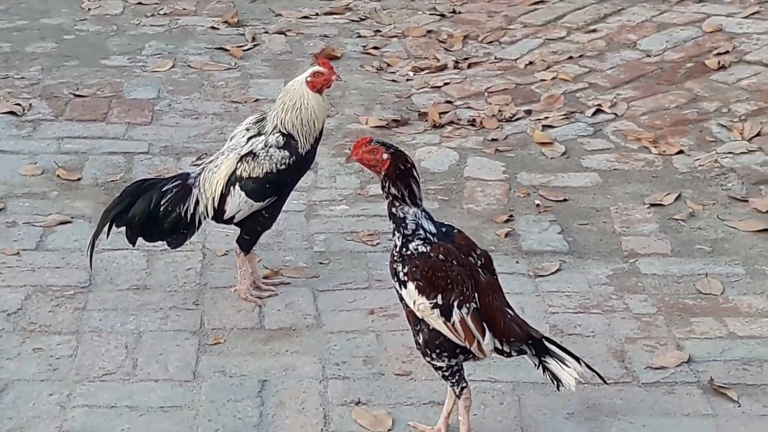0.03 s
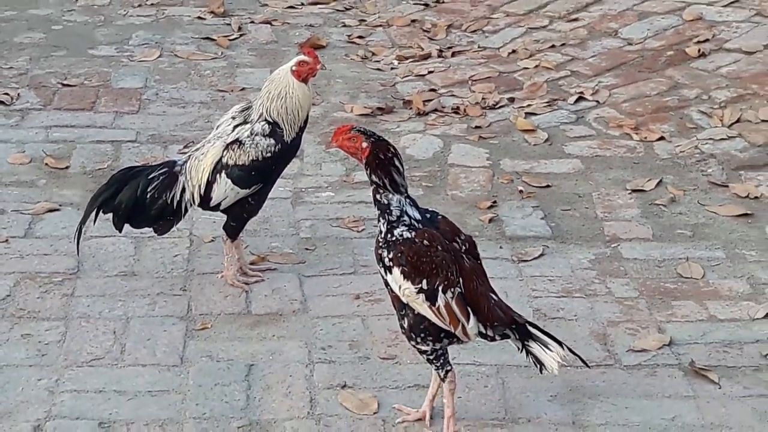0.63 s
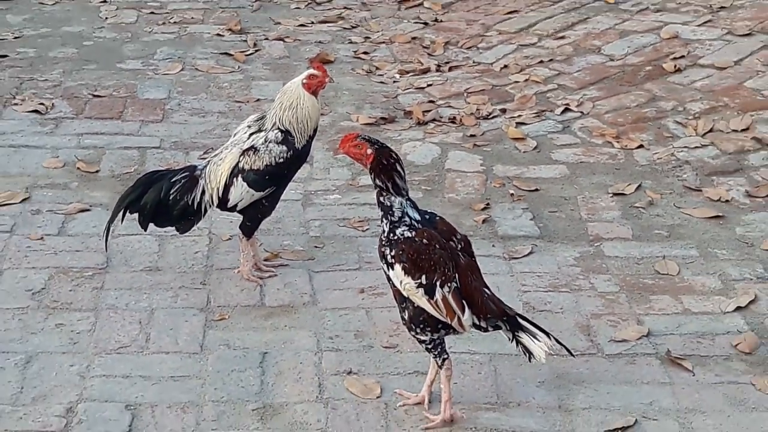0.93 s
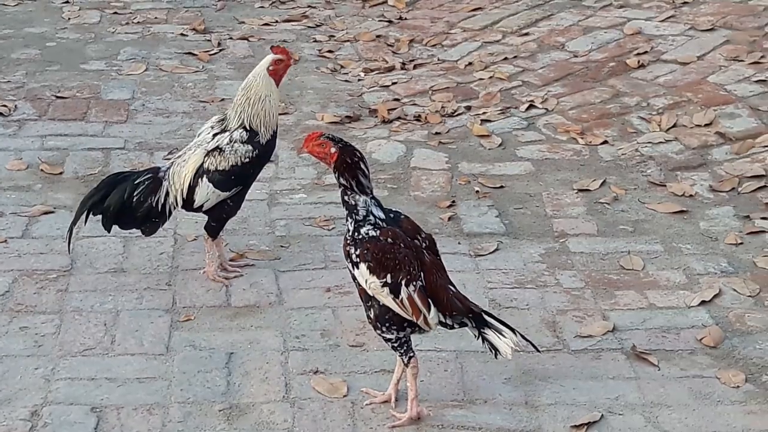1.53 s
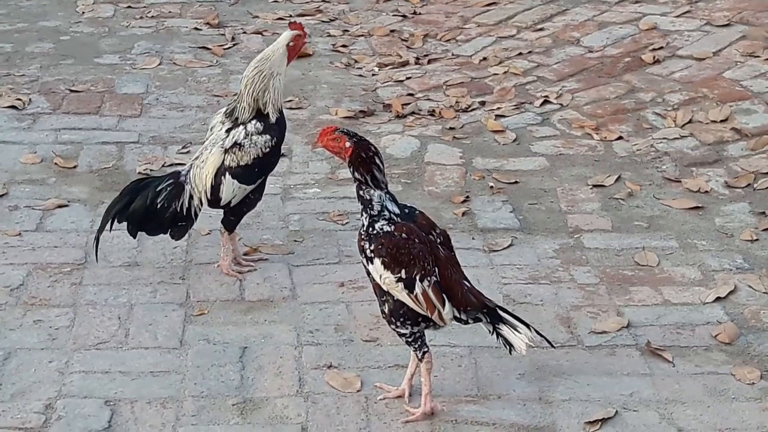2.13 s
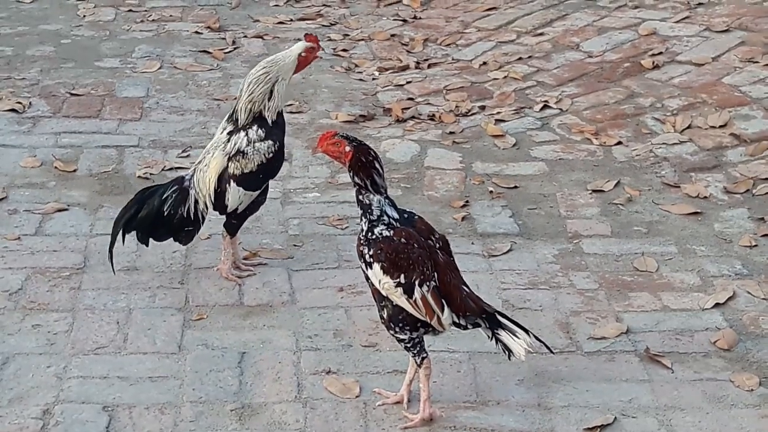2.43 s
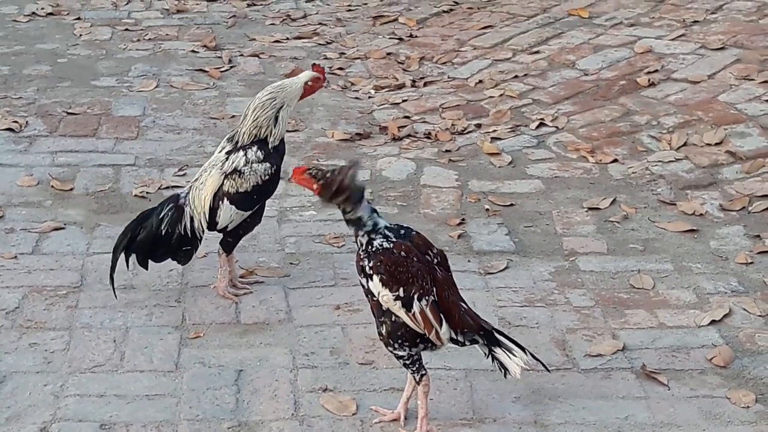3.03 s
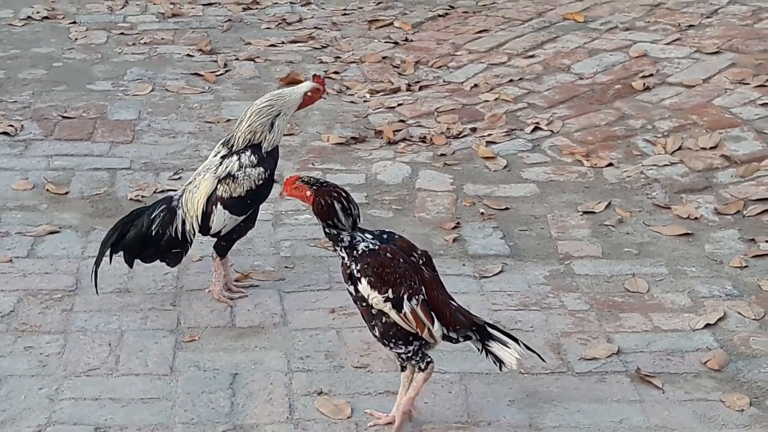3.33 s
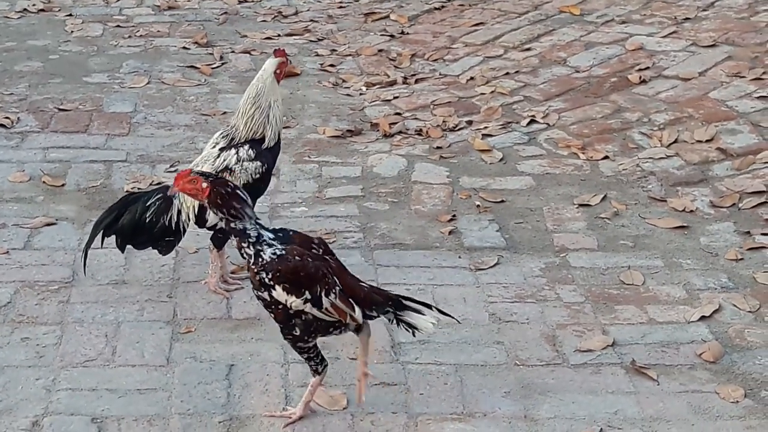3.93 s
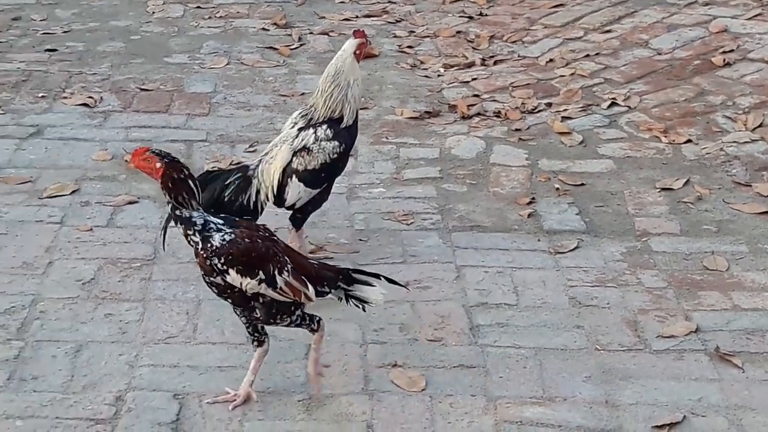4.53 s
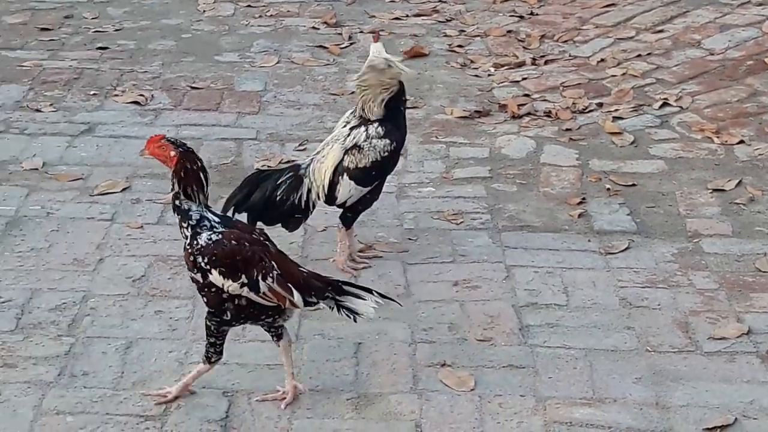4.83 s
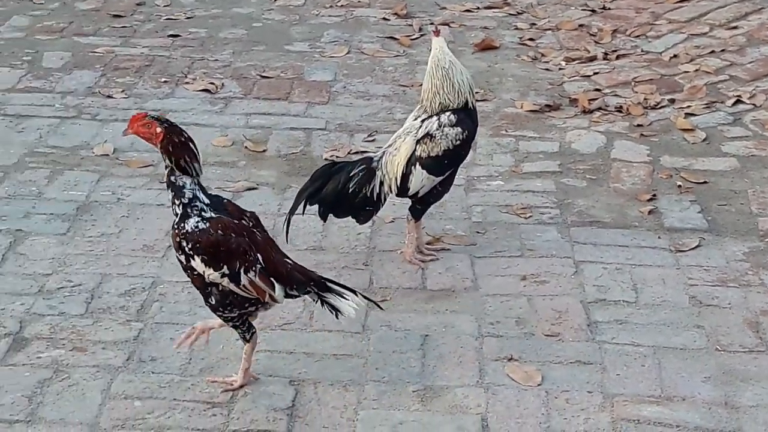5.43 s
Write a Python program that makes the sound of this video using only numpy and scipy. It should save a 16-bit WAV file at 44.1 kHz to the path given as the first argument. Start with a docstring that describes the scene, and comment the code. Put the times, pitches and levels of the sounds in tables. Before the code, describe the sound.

A rooster crows once nearby in a yard, over faint bird chirps, a distant puttering engine and soft hiss.

```python
"""A soft background hiss lies under a brick farmyard; a distant engine putters up, a far bird calls
hoarsely and small birds chirp, with a light tick on the paving. At 2.3 s a rooster a few metres away
crows once: its syrinx flips between a high ringing register, a low register and a chaotic rasp, and
paving and walls answer. From 3.7 s the birds are heard again, with a second tick; the engine swells,
then falls back to idle."""
import sys
import numpy as np
from scipy import signal
from scipy.fft import rfft, irfft
from scipy.io import wavfile
from scipy.ndimage import uniform_filter1d, minimum_filter1d

SR = 44100
rng = np.random.default_rng(int(sys.argv[2]) if len(sys.argv) > 2 else 0)


def output_pcm(signal):
    """Save a mono or channel-first signal as 16-bit PCM at the path in sys.argv[1].

    Samples are clipped to [-1, 1] before scaling.
    """
    pcm = np.clip(np.atleast_2d(signal).T, -1, 1) * 32767
    wavfile.write(sys.argv[1], SR, np.round(pcm).astype(np.int16))


N = 251370
TIME = np.arange(N) / SR
TOP_HZ = 15750  # upper edge of the sound

# bursts of rasp where the voice breaks:
# start_s, length_s, attack_s, release_s, low_db, upper_db, edge_db, slaps_per_s, chaos (0-1)
RASP_BURSTS = [(2.364, 0.1775, 0.018, 0.0738, -22.5, -24, -29, 511.4, .3),
               (2.663, 0.0418, .018, 0.0245, -17, -29, -46.5, 690, .12),
               (2.77, 0.0523, 0.022, 0.0307, -20.5, -29.5, -53, 780, 0.21),
               (2.844, 0.0572, 0.0302, 0.0248, -18, -24.5, -39.5, 730, .13),
               (2.92, 0.228, .045, 0.04, -24, -29.5, -42.5, 418, .145),
               (3.215, 0.2496, 0.0291, 0.023, -23, -28.5, -58.5, 634.5, 0.2),
               (3.534, 0.0481, 0.0122, 0.0424, -26.5, -35.5, -60.5, 436, 0.22)]


def gain_of(db):
    """Decibels to amplitude."""
    return 10 ** (np.asarray(db) / 20)


def unit_rms(x):
    """Scales to rms 1."""
    return x / np.sqrt(np.mean(x ** 2) + 1e-20)


def curve_at(points, hz):
    """Reads a curve on a log-frequency axis."""
    f, value = np.transpose(points)
    return np.interp(np.log(hz + 1), np.log(f + 1), value)


def add(mix, start_s, sound):
    """Mixes a sound in at start_s."""
    part = mix[max(round(start_s * SR), 0):][:len(sound)]
    part += sound[:len(part)]


def wander(hz, size):
    """Smooth random drift of rms about 1, moving at up to about hz."""
    f = np.fft.rfftfreq(2 ** 15, 1 / SR)
    return unit_rms(irfft(rfft(rng.standard_normal(2 ** 15)) / (1 + (f / hz) ** 4)))[:size]


def resonate(x, hz, width_hz):
    """A steep resonance of gain 1 whose centre can glide."""
    turn = np.exp(2j * np.pi * np.cumsum(hz * np.ones(len(x))) / SR)
    r = np.exp(-np.pi * width_hz / SR)
    return 2 * (turn * signal.lfilter([(1 - r) ** 2], [1, -2 * r, r * r], x / turn + 1e-18)).real


def envelope(length_s, attack_s, release_s):
    """Time within a note, and its rounded attack, hold and release."""
    t = np.arange(round(length_s * SR)) / SR
    rise = np.sin(np.pi / 2 * np.minimum(t / attack_s, 1))
    fall = np.sin(np.pi / 2 * np.minimum((length_s - t) / release_s, 1))
    return t, rise * fall


def stereo_pair(left, other, likeness, hz):
    """Blends two noise spectrograms into left and right, as alike as asked in each band."""
    same = np.clip(curve_at(likeness, hz), -1, 1)[:, None]
    return np.array([left, same * left + np.sqrt(1 - same ** 2) * other])


def whistle(hz, taper):
    """A sine of rms 1 that follows a pitch curve and fades at both ends."""
    return unit_rms(np.sin(2 * np.pi * np.cumsum(hz) / SR) * signal.windows.tukey(len(hz), taper))


def background_hiss(level_db, patchy_db):
    """A soft bed of noise with drifting patches, nearly mono in the bass."""
    # spectrum of the soft background hiss, strongest in the bass, almost silent above 8 kHz:
    # frequency_hz, relative_db
    spectrum = [(22, -43), (45, -33), (66, -12.5), (105, -4.5), (170, -3.5), (300, -4.5), (500, -7),
                (900, -10.5), (2000, -15), (3500, -20.5), (5000, -29), (8000, -36.5), (10000, -61.5),
                (15500, -44)]
    # likeness of left and right: frequency_hz, correlation
    likeness = [(50, 0.96), (200, 0.89), (500, 0.65), (1200, 0), (3000, 0), (10000, 0.01)]
    frames, hz = N // 512 + 5, np.fft.rfftfreq(2048, 1 / SR)
    a, b, c, d, patches = rng.standard_normal((frames, len(hz), 5)).T
    patches = unit_rms(uniform_filter1d(uniform_filter1d(patches, size=16, axis=0), size=10, axis=1))
    bands = stereo_pair(a + 1j * b, c + 1j * d, likeness, hz)
    bands *= gain_of(curve_at(spectrum, hz)[:, None] + patchy_db * patches)
    return gain_of(level_db) * unit_rms(signal.istft(bands, nperseg=2048, noverlap=1536)[1][:, :N])


def engine(pipe_hz, width_hz, thud_hz, thud_db):
    """Each firing of a far single cylinder thumps in its exhaust pipe, over a duller thud."""
    # revving up, then idling away: time_s, level_db, firings_per_s
    revs = [(0, -80.5, 22.66), (1.7, -53.5, 29.7), (3.2, -53, 28.74), (3.85, -45.5, 28.72),
            (4.13, -40.5, 29), (4.2, -50, 28.1), (4.55, -49.5, 25), (4.7, -58, 24.5), (5.7, -59, 25)]
    times, *curves = np.transpose(revs)
    db, rate = (np.interp(TIME, times, curve) for curve in curves)
    firings = np.diff(np.floor(np.cumsum(rate) / SR), prepend=0)
    firings *= gain_of(2.09 * rng.standard_normal(N))
    pipe = unit_rms(resonate(resonate(firings, pipe_hz, width_hz), pipe_hz, 2 * width_hz))
    thud = unit_rms(resonate(firings, thud_hz, width_hz=110))
    return gain_of(db) * (pipe + gain_of(thud_db) * thud)


def ticks():
    """Tiny dry clicks, as of a claw or leaf on brick."""
    # taps on the paving: start_s, peak_db
    taps = [(1.1222, -49), (4.2231, -45.5)]
    out, t = np.zeros(N), TIME[:2000]
    for start_s, db in taps:
        burst = rng.standard_normal(len(t)) * np.exp(-t / 0.0042)
        click = resonate(burst, hz=5100, width_hz=2830)
        add(out, start_s, gain_of(db) * click / abs(click).max())
    return out


def far_bird():
    """Sagging calls, made hoarse by a fast waver in pitch."""
    # hoarse calls: start_s, length_s, pitch_hz, relative_db
    calls = [(0, 0.0706, 1847, -50.5), (0.39, 0.239, 1839, -48), (0.941, 0.2016, 1827, -47.5),
             (1.711, 0.177, 1805, -47.5), (3.851, 0.2159, 1818, -43.5), (4.208, 0.1543, 1755, -48)]
    out = np.zeros(N)
    for start_s, length_s, hz, db in calls:
        progress = np.linspace(0, 1, int(length_s * SR))
        pitch = hz * (1.035 - .03 * progress) + 125 * wander(600, len(progress))
        add(out, start_s, gain_of(db - 3) * whistle(pitch, taper=.5))
    return out


def small_birds():
    """Short gliding whistles with a smeared pitch."""
    # chirps: start_s, length_s, start_hz, end_hz, relative_db, smear_hz
    chirps = [(0.832, 0.05, 5150, 5910, -62.5, 300), (0.931, 0.0357, 2017, 2320, -46, 120),
              (1.03, 0.179, 2130, 2765, -56, 120), (1.401, 0.156, 4080, 5270, -54.5, 170),
              (1.484, 0.151, 4614, 5900, -60, 222), (1.662, 0.16, 4630, 5510, -62.5, 301),
              (1.739, 0.082, 6900, 6900, -62.5, 300), (1.915, 0.26, 4996, 5120, -61.5, 295.7),
              (1.956, 0.063, 6900, 7310, -64, 300), (2.149, 0.057, 6833, 6680, -60, 249),
              (3.758, 0.044, 5320, 4530, -56, 40.35), (4.484, 0.0854, 4740, 5900, -62.5, 200),
              (4.705, 0.082, 4710, 5900, -63, 200), (4.928, 0.066, 4610, 5760, -64, 199.8),
              (5.041, 0.108, 3958, 2880, -56.5, 150), (5.086, .125, 3756, 2575, -50, 81)]
    out = np.zeros(N)
    for start_s, length_s, start_hz, end_hz, db, smear_hz in chirps:
        progress = np.linspace(0, 1, int(length_s * SR))
        glide = end_hz + (start_hz - end_hz) * (1 - progress) ** 1.8
        pitch = glide + smear_hz * wander(550, len(progress))
        add(out, start_s, gain_of(db) * whistle(pitch, taper=.6))
    return out


def yard_reverb(x):
    """Diffuse ring of the yard: quick scatter off the bricks, then each band dies at its own speed."""
    # decay of the ring: frequency_hz, t60_s
    decay = [(300, 0.65), (560, 1.662), (800, 0.424), (1200, 0.55), (1700, 1.35), (2500, 0.75),
             (5000, 0.803), (9000, 0.67), (15000, 0.11)]
    # likeness of left and right: frequency_hz, correlation
    likeness = [(200, .85), (600, .45), (1200, -.3), (4000, -.4)]
    hz, t, (left, other) = signal.stft(rng.standard_normal((2, SR)), SR, nperseg=256)
    ring = gain_of(-60 * t / curve_at(decay, hz)[:, None])
    early = 1.2 * np.exp(-t / 0.0047)
    build_up = 1 - np.exp(-t / 0.00664)
    bands = stereo_pair(left, other, likeness, hz) * (ring + early) * build_up
    tail = signal.istft(bands, SR, nperseg=256)[1]
    return signal.fftconvolve(x[None], tail / np.linalg.norm(tail[0]), axes=1)[:, :N]


def with_echoes(x):
    """The direct sound and its first distinct reflections."""
    # bounces off paving and walls: delay_s, left_gain, right_gain
    bounces = [(0.0125, 0.11, 0.018), (0.0203, 0.213, -0.359), (.034, 0.12, 0.194), (.049, -.07, .09),
               (0.084, 0.134, 0.195)]
    out = np.array([x, x])
    for delay_s, left, right in bounces:
        add(out[0], delay_s, left * x)
        add(out[1], delay_s, right * x)
    return out


def paving_scatter(x, above_hz, decay_s):
    """Treble thrown back at once by the rough paving, different left and right."""
    t = TIME[:1024]
    spray = rng.standard_normal((2, len(t))) * np.exp(-t / decay_s)
    low_cut = signal.butter(2, above_hz, "highpass", fs=SR, output="sos")
    spray = signal.sosfilt(low_cut, spray / np.linalg.norm(spray[0]))
    return signal.oaconvolve(x[None], spray, axes=1)[:, :N]


def windpipe(drive, modes, beak):
    """Rings the windpipe's modes; those below 4500 Hz move with the beak."""
    return unit_rms(sum(gain_of(db) * resonate(drive, hz * (beak if hz < 4500 else 1), width_hz)
                        for hz, width_hz, db in modes))


def rasp(start_s, length_s, attack_s, release_s, low_db, upper_db, edge_db, slaps_per_s, chaos):
    """The membranes slap at uneven intervals and, with the breath, ring the windpipe."""
    # low and upper windpipe modes, and the harsh edge of a pressed voice: centre_hz, width_hz, gain_db
    low_modes = [(707.7, 106.6, 4.5), (1125, 335, 2.5), (1347.5, 91, -9.5), (1699, 171.4, 3),
                 (2130, 98.4, -3)]
    upper_modes = [(2543, 110, -21.5), (2894.7, 100.7, 6), (3481, 200, -3.5), (3855, 286, 8),
                   (4119, 87, -4), (4971.4, 160, -3), (5900, 120, -26.5), (6900, 320, -31),
                   (7874, 617, -27), (12360, 970, -29)]
    edge_modes = [(2860, 130, -1.5), (3174, 530, 6.5), (3990, 140, 2), (5910, 210, -5), (7920, 440, -25.5),
                  (12900, 1300, -43.5)]
    # the beak's opening retunes the modes: time_s, frequency_ratio
    beak_moves = [(2.34, 0.947), (2.43, 0.968), (2.53, 0.937), (2.8, 1.0175), (2.88, 1.0206),
                  (3.25, 0.9356), (3.45, 0.9304), (3.57, 0.847)]
    t, shape = envelope(length_s, attack_s, release_s)
    beak = np.interp(start_s + t, *np.transpose(beak_moves))
    cycles = np.cumsum(slaps_per_s * np.exp(chaos * wander(397.77, len(t)))) / SR
    slaps = np.diff(np.floor(cycles), prepend=0) * gain_of(10 * chaos * wander(600, len(t)))
    breath = 0.413 * rng.standard_normal(len(t))
    drive = unit_rms(slaps - slaps.mean()) + breath
    layers = (low_db, low_modes), (upper_db, upper_modes), (edge_db, edge_modes)
    return shape * sum(gain_of(db) * windpipe(drive, modes, beak) for db, modes in layers)


def rasp_strength():
    """Amplitude of the chaotic vibration through the crow."""
    out = np.zeros(N)
    for start_s, length_s, attack_s, release_s, low_db, *_ in RASP_BURSTS:
        add(out, start_s, gain_of(low_db) * envelope(length_s, attack_s, release_s)[1])
    return out


def syrinx(start_s, hz, level, tone, fundamental_db, blur_hz, jitter, shimmer_db, flutter_hz, doubling):
    """Regular vibration; as the rasp gains on it, pitch wavers and cycles alternate strong and weak."""
    rasp_level = gain_of(7.5) * rasp_strength()[round(start_s * SR):][:len(hz)]
    unrest = 0.078 + rasp_level / (rasp_level + level + 1e-9)  # even a clean note wavers a little
    pitch = hz * (1 + jitter * unrest * wander(flutter_hz, len(hz)))
    phase = 2 * np.pi * np.cumsum(pitch) / SR
    alternate = 1 + doubling * unrest * np.cos(phase / 2)  # adds tones midway between the overtones
    wave, power = 0, 0
    for k in range(1, 28):
        size = gain_of(curve_at(tone, k * hz) + fundamental_db * (k == 1)) * (k * hz < TOP_HZ)
        # turbulence smears the overtones, most of all above blur_hz
        blur = np.minimum((k * hz / blur_hz) ** 2, 2) * wander(170, len(hz))
        lag = np.pi * (k // 2)  # the windpipe delays each overtone differently, rounding the pulses
        wave = wave + size * np.sin(k * phase + lag + blur) * (alternate if k > 1 else 1)
        power = power + size ** 2 / 2
    shimmer = gain_of(shimmer_db * unrest * np.tanh(wander(66, len(hz))))
    return wave / np.sqrt(power) * level * shimmer


def high_note(start_s, length_s, attack_s, release_s, db, swell_db_per_s, top_hz, scoop, bend_s=.012):
    """The taut syrinx scoops up to a ringing, slightly arched pitch and droops at the end."""
    # overtone balance: frequency_hz, relative_db
    tone = [(600, 24), (840, -3.5), (1680, -0.5), (2520, -20), (3370, -30.5), (4200, -33), (5060, -30.5),
            (5900, -39), (6760, -36.5), (7600, -48.5), (8440, -42), (10200, -61.5), (13000, -47),
            (15500, -60)]
    t, shape = envelope(length_s, attack_s, release_s)
    droop = 0.0697 * np.exp((t - length_s) / bend_s)
    arch = 0.02517 * (2 * t / length_s - 1) ** 2
    hz = top_hz * (1 - scoop * np.exp(-t / bend_s) - droop - arch)
    level = shape * gain_of(db + swell_db_per_s * t)
    return syrinx(start_s, hz, level, tone, fundamental_db=0, blur_hz=8000,
                  jitter=0.02406, shimmer_db=5, flutter_hz=191, doubling=0.34)


def low_note(start_s, length_s, attack_s, release_s, db, start_hz, middle_hz, end_hz, fundamental_db):
    """The slack syrinx holds a low pitch that bends at both ends."""
    # overtone balance: frequency_hz, relative_db
    tone = [(530, -4), (1080, 6.5), (1640, -5), (2180, -13.5), (2720, -17), (3300, -16), (3700, -12),
            (4400, -27.5), (4950, -22.5), (5600, -36), (8400, -44), (15000, -50)]
    t, shape = envelope(length_s, attack_s, release_s)
    from_middle = 2 * t / length_s - 1
    hz = middle_hz + (np.where(from_middle < 0, start_hz, end_hz) - middle_hz) * from_middle ** 2
    return syrinx(start_s, hz, shape * gain_of(db), tone, fundamental_db, blur_hz=4500,
                  jitter=0.01112, shimmer_db=3.5, flutter_hz=140, doubling=.05)


def crow():
    """Both registers and the rasp of one crow; the small beak radiates no bass."""
    # ringing high register:
    # start_s, length_s, attack_s, release_s, level_db, swell_db_per_s, pitch_hz, scoop (share of pitch)
    high_notes = [(2.361, 0.203, 0.0281, 0.108, -20.5, -12, 815.3, .25),
                  (2.666, .125, 0.0512, 0.0434, -15, 86, 848.8, .27),
                  (2.869, 0.2454, 0.0282, 0.0392, -12, -25, 847.2, 0)]
    # low register:
    # start_s, length_s, attack_s, release_s, level_db, start_hz, middle_hz, end_hz, fundamental_db
    low_notes = [(2.341, 0.0326, 0.0178, 0.0084, -24.5, 505.8, 529.6, 603, -5.5),
                 (2.381, 0.1562, 0.13, 0.045, -25, 524.7, 537.4, 534.4, -10.5),
                 (2.633, 0.0393, 0.035, 0.021, -21.5, 474, 521.8, 632.6, -14.5),
                 (2.798, 0.0647, 0.024, 0.025, -21, 570.3, 540.7, 607.5, -9.5),
                 (3.088, .157, .02, 0.021, -24, 551.9, 523.7, 634.1, -6),
                 (3.453, 0.1114, 0.0217, 0.067, -22, 555.7, 548.2, 460.9, 8)]
    out = np.zeros(N)
    for voice, notes in (high_note, high_notes), (low_note, low_notes), (rasp, RASP_BURSTS):
        for start_s, *settings in notes:
            add(out, start_s, voice(start_s, *settings))
    return signal.sosfiltfilt(signal.butter(4, 410, "highpass", fs=SR, output="sos"), out)


def scene():
    """The near rooster in its yard, over the far sounds."""
    # the crow's stereo balance: frequency_hz, left_minus_right_db
    balance = [(300, -1.5), (700, 1.5), (1200, -1.5), (1700, -0.5), (2400, -3), (3600, -2.5), (5000, 1),
               (8100, -14), (15000, -1.5)]
    voice, song = crow(), small_birds() + far_bird()
    scatter = gain_of(-3) * paving_scatter(voice, above_hz=6500, decay_s=.004)
    rooster = with_echoes(voice) + scatter + gain_of(-11.5) * yard_reverb(voice)
    side_db = curve_at(balance, np.fft.rfftfreq(N, 1 / SR)) / 2
    rooster = irfft(rfft(rooster) * gain_of([side_db, -side_db]), N)
    putter = engine(pipe_hz=292, width_hz=125, thud_hz=153, thud_db=-12)
    birds = gain_of(-5.5) * song + gain_of(-4.0) * yard_reverb(song)
    background = birds + putter + ticks() + background_hiss(level_db=-46, patchy_db=1.3851)
    return rooster + background * gain_of([[-.6], [.6]])  # the background leans slightly right


def record(dry):
    """A quick limiter holds the loudest peaks; a steep low-pass trims the very top."""
    needed_gain = np.minimum(1, .85 / (abs(dry).max(0) + 1e-9))
    limited = dry * uniform_filter1d(minimum_filter1d(needed_gain, size=441), size=441)
    low_pass = signal.firwin(511, TOP_HZ, window=("kaiser", 9), fs=SR)
    return signal.oaconvolve(limited, low_pass[None], "same")


dry = scene()
out = record(dry)
output_pcm(out)
```